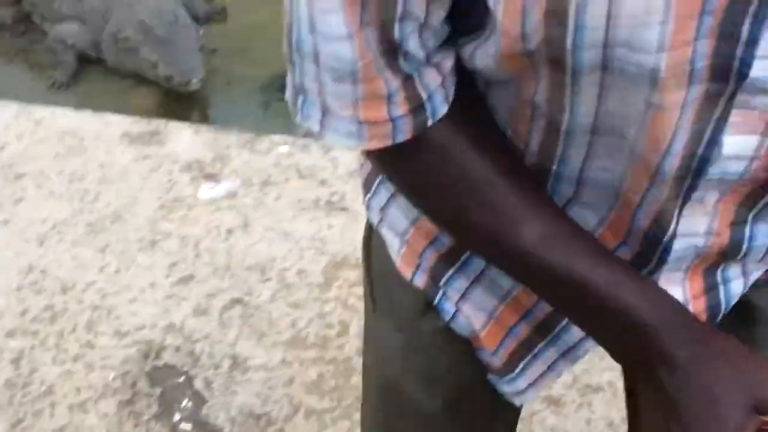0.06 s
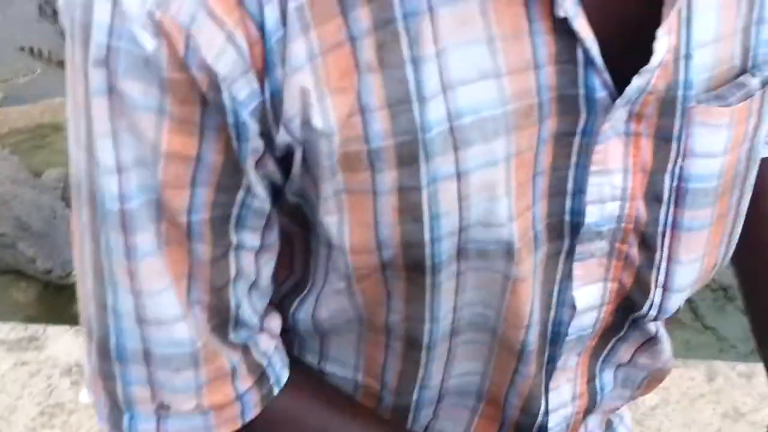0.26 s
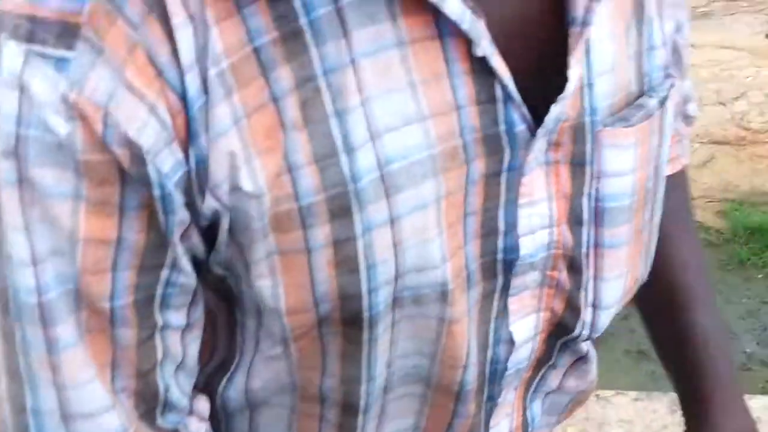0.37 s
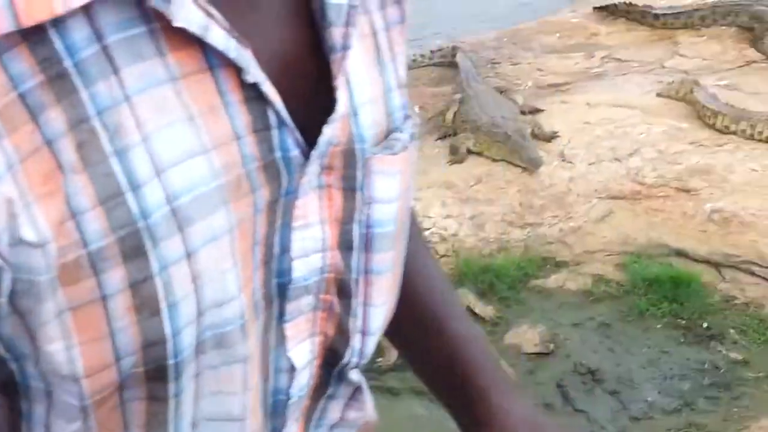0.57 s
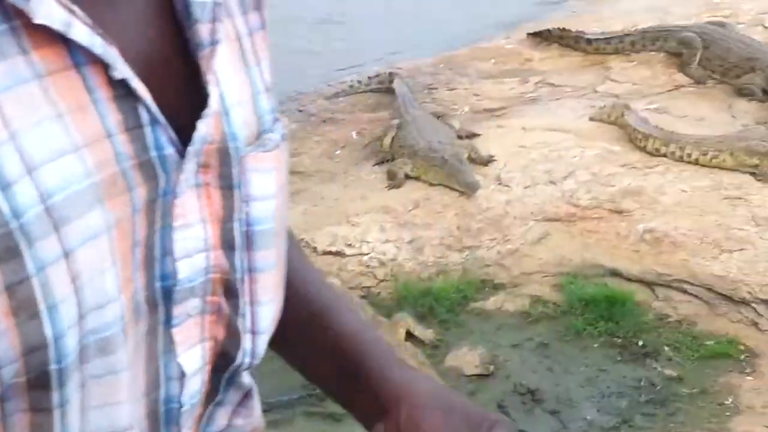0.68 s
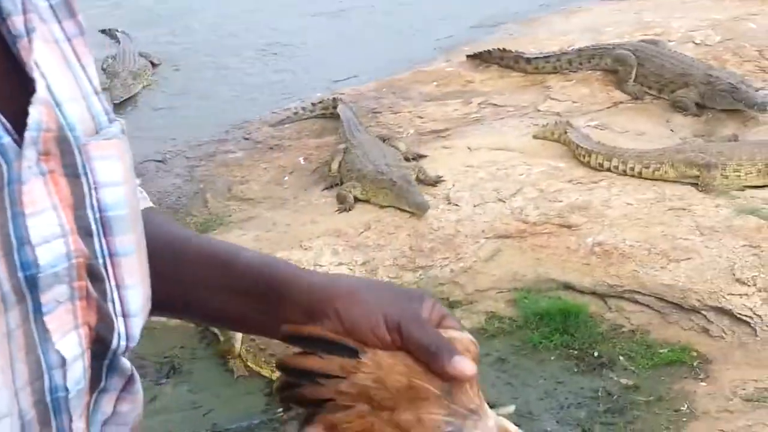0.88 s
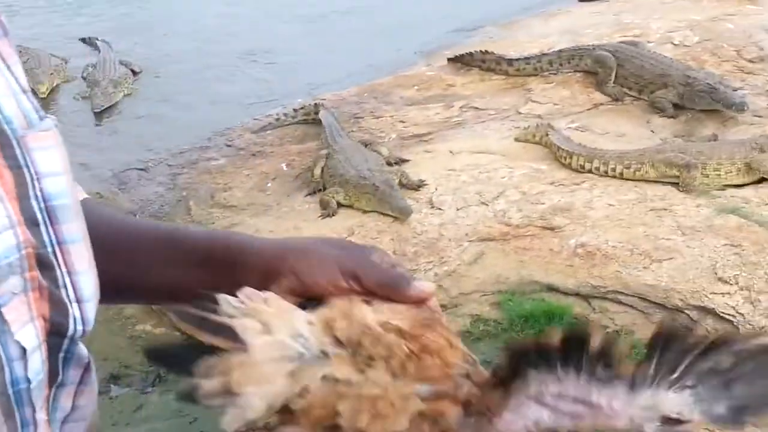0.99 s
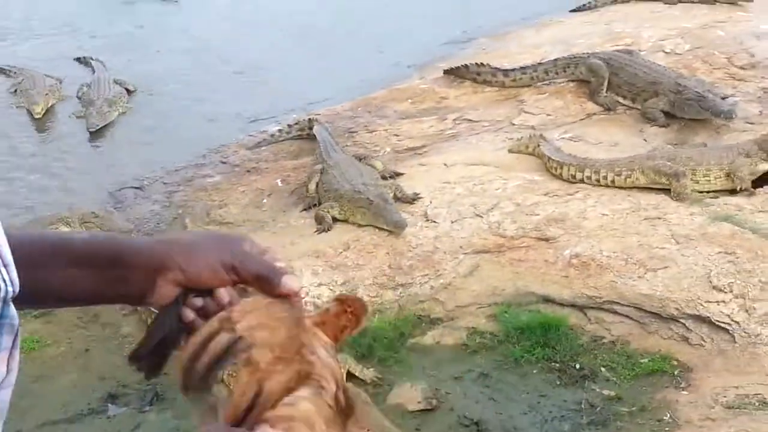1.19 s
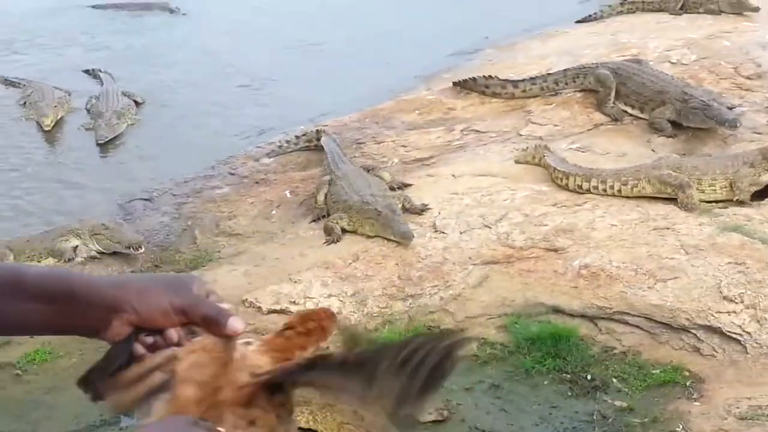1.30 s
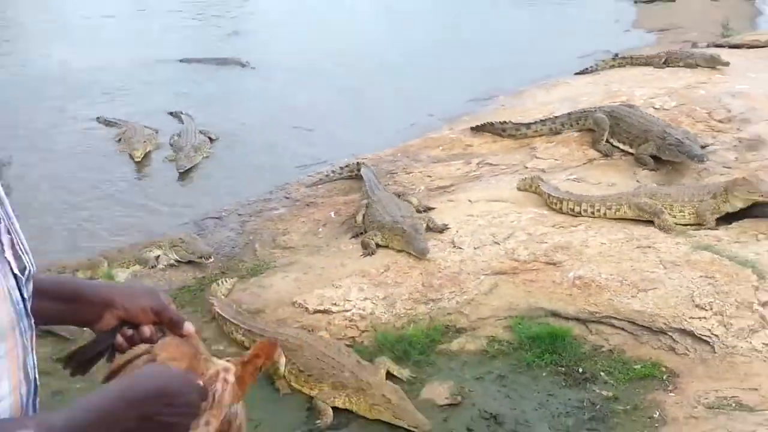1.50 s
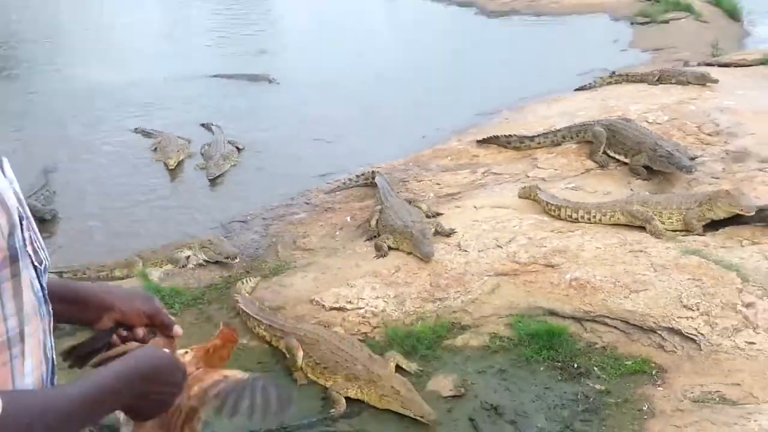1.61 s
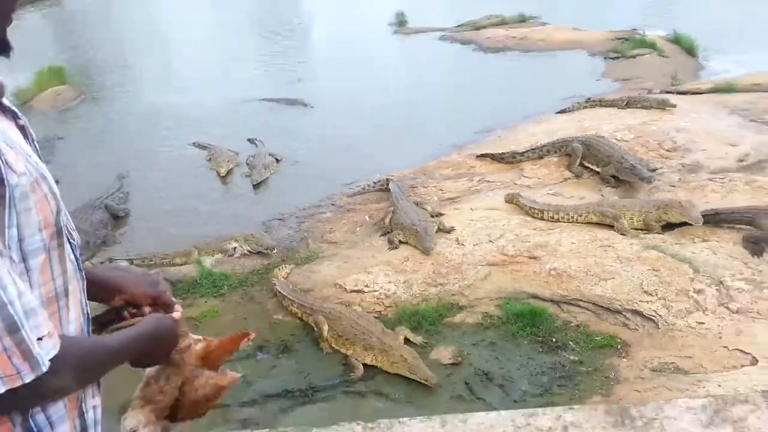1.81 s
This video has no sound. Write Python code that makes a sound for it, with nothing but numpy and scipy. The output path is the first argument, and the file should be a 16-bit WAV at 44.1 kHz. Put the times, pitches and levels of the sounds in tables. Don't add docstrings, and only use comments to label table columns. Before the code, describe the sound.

Harsh raspy chicken squawks very near the microphone, with a sharp knock and faint outdoor wash

```python
import sys
import numpy as np
from scipy import signal
from scipy.fft import rfft, irfft
from scipy.io import wavfile
from scipy.ndimage import uniform_filter1d, minimum_filter1d, map_coordinates

SR = 44100
rng = np.random.default_rng(int(sys.argv[2]) if len(sys.argv) > 2 else 0)


def magnitude_from_level(level_db):
    exponent = np.asarray(level_db, float) / 20
    return 10 ** exponent


def persist_wave(psi):
    counts = np.round(np.clip(psi, -1, 1) * 32767).astype(np.int16)
    wavfile.write(sys.argv[1], SR, np.atleast_2d(counts).T)


N = 81585


def evened(x):
    return x / np.sqrt(np.mean(x ** 2) + 1e-20)


def read(points, hz):
    f, value = np.transpose(points)
    return np.interp(np.log(hz + 1), np.log(f + 1), value)


def columns(rows):
    s, *cols = np.transpose(rows)
    start, end = round(s[0] * SR), round(s[-1] * SR)
    t = np.arange(start, end) / SR
    return start, [np.interp(t, s, c) for c in cols]


def add(mix, at, sound):
    part = mix[..., at:at + sound.shape[-1]]
    part += sound[..., :part.shape[-1]]


def drift(count, hz):
    pole = [1, -np.exp(-2 * np.pi * hz / SR)]
    once = signal.lfilter([1], pole, rng.standard_normal(N))
    return evened(signal.lfilter([1], pole, once)[-count:])


def edges(count, s=0.0016):
    k = np.arange(count)
    return np.clip(np.minimum(k, count - k) / (s * SR), 0, 1)


def resonate(x, hz, width):
    turn = np.exp(2j * np.pi * np.cumsum(hz * np.ones(len(x))) / SR)
    r = np.exp(-np.pi * width / SR)
    return 2 * (turn * signal.lfilter([(1 - r) ** 2], [1, -2 * r, r * r], x / turn)).real


def split(db):
    return magnitude_from_level(np.multiply.outer([.5, -.5], db))


def echoes(x, gap_s, t60):
    t = np.arange(SR // 2) / SR
    signs = rng.choice([-1., 1.], (2, len(t)))
    present = rng.random((2, len(t))) < .06
    taps = signs * present * magnitude_from_level(-60 * t / t60) * (t > gap_s)
    taps = taps / np.linalg.norm(taps, axis=1, keepdims=True)
    return signal.fftconvolve(x, taps, axes=1)[:, :N]


def noise(tone_curve, patchy_db, flicker_db):
    # frequency in Hz, likeness of left and right (-1 to 1)
    likeness = [(400, 0.74), (1500, -0.42), (2500, -0.3)]
    # frequency in Hz, left minus right in dB
    shade = [(100, -1), (3000, -3), (8000, -10.5)]
    frames, hz = N // 128 + 5, np.fft.rfftfreq(512, 1 / SR)
    a, b, c, d, grain = rng.standard_normal((frames, 257, 5)).T
    flicker = evened(uniform_filter1d(uniform_filter1d(grain, size=60, axis=0), size=2, axis=1))
    patches = evened(uniform_filter1d(uniform_filter1d(grain, size=6, axis=0), size=20, axis=1))
    same = np.clip(read(likeness, hz), -1, 1)[:, None]
    left = a + 1j * b
    right = same * left + np.sqrt(1 - same ** 2) * (c + 1j * d)
    z = np.array([left, right]) * split(read(shade, hz))[:, :, None]
    z = z * magnitude_from_level(read(tone_curve, hz)[:, None] + patchy_db * patches + flicker_db * flicker)
    return evened(signal.istft(z, nperseg=512, noverlap=384)[1][:, :N])


def open_air():
    # time in seconds, level in dB
    level = [(.1, -47.5), (.35, -43.5), (.44, -73.5), (.58, -86), (.62, -52), (.68, -66.5), (.75, -52),
             (.85, -52), (.95, -44), (1.08, -35.5), (1.11, -55), (1.17, -41), (1.35, -44), (1.47, -52),
             (1.55, -46), (1.85, -46)]
    # frequency in Hz, level in dB
    colour = [(25, -38), (100, 0), (280, 13.5), (700, 4.5), (2500, -18), (6000, -60), (15000, -50)]
    fader = magnitude_from_level(np.interp(np.arange(N) / SR, *np.transpose(level)))
    return fader * noise(colour, patchy_db=1.5, flicker_db=1.2)


def rustle():
    # time in seconds, level in dB
    level = [(0, -36.5), (.13, -37.5), (.17, -43.5), (.4, -32.5), (.86, -29), (.91, -36.5), (.96, -35),
             (1.2, -34), (1.4, -36), (1.48, -49), (1.52, -31.5), (1.66, -34.5), (1.7, -40.5), (1.85, -38)]
    # frequency in Hz, level in dB
    colour = [(100, -44), (250, -22), (600, -5), (1500, -1), (5000, -1.5), (8000, -11), (12000, -17),
              (15000, -47)]
    fader = magnitude_from_level(np.interp(np.arange(N) / SR, *np.transpose(level)))
    return fader * noise(colour, patchy_db=1.4, flicker_db=1.8)


def wing_draughts():
    # start in seconds, level in dB
    puffs = [
        (1.001, -31.5),
        (1.034, -34.5),
        (1.289, -40.5),
    ]
    out = np.zeros((2, N))
    for s, db in puffs:
        count = round(0.027 * SR)
        push = np.array([drift(count, 94), drift(count, 70)])
        add(out, round(s * SR), magnitude_from_level(db) * push * np.hanning(count))
    return out


def bumps():
    # start in seconds, level in dB, length in seconds, centre in Hz
    knocks = [
        (.007, -27, .006, 5200),
        (0.083, -29.5, .016, 4510),
        (0.982, -6.5, 0.004, 4200),
        (1.042, -25, 0.024, 8120),
        (1.157, -22.5, 0.015, 510),
        (1.159, -18, 0.0063, 5050),
    ]
    out = np.zeros((2, N))
    for s, db, length, hz in knocks:
        t = np.arange(0, 2 * length, 1 / SR)
        a, b = rng.standard_normal((2, 4000))[:, :len(t)] * magnitude_from_level(2.0 * drift(len(t), 660))
        grit = [evened(resonate(v, hz, 3200)) for v in (a, .8 * a + .6 * b)]
        swell = magnitude_from_level(db - 12.8 * (t / length / 2) ** 2) * np.minimum(t / 0.011, 1)
        add(out, round(s * SR), split(-5.0)[:, None] * grit * swell)
    return out


def squeaks():
    # time in seconds, pitch of the third harmonic in Hz, level in dB
    glides = [
        [(0.034, 4100, -44), (0.042, 4655, -19), (0.05, 4900, -50)],
        [(0.055, 4600, -16), (0.061, 4850, -24), (0.068, 4500, -41)],
    ]
    harmonics_db = [-25, -13, -9, -19]
    out = np.zeros(N)
    for rows in glides:
        at, (hz, db) = columns(rows)
        turns = np.cumsum(hz / 3 * (1 + 0.002 * drift(len(hz), 300))) / SR
        voice = sum(magnitude_from_level(db + g) * np.sin(2 * np.pi * (m + 1) * turns) for m, g in enumerate(harmonics_db))
        add(out, at, voice * edges(len(hz), 0.0022))
    out = np.array([out * magnitude_from_level(12.5), np.roll(out, 20) * magnitude_from_level(12.0)])
    return out + magnitude_from_level(-21.0) * echoes(out, .002, .12)


def rasp(rows, tilt_db):
    # multiple of the windpipe pitch, width in Hz, level in dB
    windpipe = [(1.0, 690, -6.5), (2.12, 770, 1), (3.1, 650, 1), (3.75, 790, 0), (4.9, 870, -4),
                (5.9, 610, -12.5), (7.1, 1300, -16.5), (8.8, 2150, -21.5)]
    jitter, shimmer_db, breath = .09, 1.8, .38
    flutter_db, chest_hz = 0.98, 700
    at, (db, hz) = columns(rows)
    turns = np.cumsum(hz * np.clip(1 + jitter * drift(len(hz), 500), .3, 2)) / SR
    size = magnitude_from_level(shimmer_db * rng.standard_normal(N // 8))[turns.astype(int)]
    slaps = evened(np.diff(np.floor(turns), prepend=0) * size)
    hiss = evened(size * np.exp(-(turns % 1) / 0.5) * rng.standard_normal(N)[:len(hz)])
    drive = (1 - breath) * slaps + breath * hiss
    pipe = np.zeros(len(hz))
    for k, (multiple, width, gain_db) in enumerate(windpipe):
        pipe += (-1) ** k * magnitude_from_level(gain_db + tilt_db * k) * resonate(drive, multiple * hz, width)
    pipe = signal.sosfilt(signal.butter(4, chest_hz, "high", fs=SR, output="sos"), pipe)
    pipe = pipe / np.sqrt(uniform_filter1d(pipe ** 2, size=700) + 1e-12)
    return at, pipe * magnitude_from_level(db + flutter_db * drift(len(hz), 38)) * edges(len(hz))


def rasping_calls():
    # time in seconds, effort in dB, windpipe pitch in Hz
    rasp_a = [(0.194, -14, 887), (0.201, -14.5, 899.5), (0.389, -13.5, 984.3), (0.458, -15, 962.6),
              (.58, -15, 918), (0.618, -25, 896), (.645, -51, 970)]
    rasp_b = [(.645, -64, 870.3), (0.704, -42, 910.3), (0.714, -20, 906.7), (0.755, -13, 926.3),
              (0.769, -59, 903.6), (0.847, -60.5, 905.7), (0.855, -16, 879), (0.906, -16.5, 887),
              (0.919, -80, 890)]
    rasp_c = [(.989, -32, 700), (.993, -14, 700), (1.008, -13, 760), (1.022, -10, 990), (1.05, -8, 980),
              (1.062, -27, 930), (1.105, -27, 950), (1.115, -18, 950), (1.135, -22, 720), (1.142, -40, 700)]
    rasp_d = [(1.216, -32, 900), (1.233, -14, 960), (1.245, -17, 960), (1.286, -16, 960), (1.304, -11, 970),
              (1.323, -15, 1030), (1.385, -12, 1030), (1.408, -14, 1011), (1.428, -26, 971),
              (1.44, -30, 983)]
    rasp_e = [(1.44, -29, 875), (1.472, -38, 801.4), (1.484, -18.5, 789.6), (1.495, -28, 806.3),
              (1.506, -18.5, 716)]
    rasp_f = [(1.747, -35.5, 720), (1.754, -35, 693.4), (1.771, -35.5, 863), (1.8, -31.5, 1024),
              (1.85, -28, 975)]
    bright_db = [-0.24, -0.91, 0.52, -0.75, 1, -2.5]
    out = np.zeros(N)
    for rows, tilt_db in zip((rasp_a, rasp_b, rasp_c, rasp_d, rasp_e, rasp_f), bright_db):
        add(out, *rasp(rows, tilt_db))
    return out


def tone(rows, overtones, throw):
    wobble_db, fall_db = 4, -2.5
    at, (hz, low_db, top_db) = columns(rows)
    turns = np.cumsum(hz * (1 + 0.0059 * drift(len(hz), 170))) / SR
    out = np.zeros((2, len(hz)))
    overtones = overtones + list(overtones[-1] + fall_db * np.arange(1, 6))
    for k, db in enumerate([low_db] + [top_db + o for o in overtones]):
        wobble = wobble_db * min(k, 4) / 4 * np.array([drift(len(hz), 33), drift(len(hz), 43)])
        pan = split(throw[min(k, len(throw) - 1)])[:, None]
        out += pan * magnitude_from_level(db + wobble) * np.cos(2 * np.pi * (k + 1) * turns - 0.8 * k * k)
    return at, np.sqrt(2) * out * edges(len(hz))


def locked_calls():
    # time in seconds, pitch in Hz, fundamental in dB, overtones in dB
    tone_a = [(.57, 781.7, -35.5, -40), (0.598, 770.6, -27, -20), (0.62, 756, -28, -29),
              (0.632, 736, -28.5, -19), (0.66, 725, -30.5, -20.5), (0.678, 745, -25.5, -16.5),
              (0.704, 703.5, -36, -21.5), (0.715, 737, -19, -19)]
    tone_b = [(.712, 755, -23.5, -21), (0.751, 767, -24.5, -24), (0.76, 765, -22, -18),
              (0.793, 766.6, -16.5, -11), (0.814, 752, -22.5, -14.5), (0.849, 746.7, -20.5, -16.5),
              (0.874, 755, -24, -23.5)]
    tone_c = [(.997, 773.6, -19, -50), (1.038, 779.4, -16, -12), (1.052, 783.3, -15, -12.5),
              (1.073, 791, -18, -10), (1.087, 799, -21, -18), (1.099, 765, -20.5, -8),
              (1.119, 762, -31, -26)]
    tone_d = [(1.385, 799, -27, -15), (1.42, 795.2, -29.5, -16.5), (1.441, 800, -24, -11),
              (1.448, 840, -32, -13)]
    tone_e = [(1.446, 824, -31, -15), (1.455, 845, -24, -15), (1.472, 867, -30.5, -13.5),
              (1.482, 825, -25, -19)]
    tone_f = [(1.479, 816, -38, -20), (1.487, 777, -23.5, -12), (1.499, 786, -35, -20),
              (1.503, 790, -59, -23)]
    overtones = [
        [-5, 5.5, -0.5, 1.5, -16.5, -8, -15, -19],
        [-3, 1.5, -8.5, -3, -20, -13.5, -26.5, -20.5],
        [-9.5, 1, -4, -7.5, -14, -12, -20, -16],
        [-16, 2, 1, -10, -13, -22, -24.5, -24.5],
        [-7, -4.5, -10.5, -6, -14.5, -19, -22, -34],
        [-0.5, -3.5, -2.5, -17, -16, -20, -35, -18.5],
    ]
    # left minus right in dB, from the fundamental up
    throw = [[4, -14, 4, 1, -1, -5], [0, -6, 4, 8, -5, -5], [-1, -8, 4, 2, 1, -6]] + 3 * [[1, 5, 0, -4, 7,
             -2]]
    out = np.zeros((2, N))
    for call in zip((tone_a, tone_b, tone_c, tone_d, tone_e, tone_f), overtones, throw):
        add(out, *tone(*call))
    return out


def catches():
    # middle in seconds, length in seconds, pitch in Hz, level in dB, left minus right in dB
    rings = [(.235, .02, 900, -27, 0), (.287, .025, 2080, -21, 3), (.325, .03, 2880, -21, 5),
             (.392, .03, 2015, -18, 3), (.39, .03, 3040, -19, 5), (.41, .06, 960, -27, 0),
             (.43, .02, 3000, -20, 5), (.996, .016, 1400, -11, 0), (1.008, .016, 1550, -15, 0),
             (1.03, .024, 2150, -13, 0), (1.046, .014, 2050, -9, 0), (1.052, .016, 3720, -14, 0),
             (1.26, .04, 1990, -16, 0), (1.303, .03, 2935, -9, 0), (1.29, .04, 970, -25, 0),
             (1.33, .04, 1000, -26, 0), (1.365, .05, 975, -22, 0), (1.345, .05, 2300, -18, 0),
             (1.41, .04, 2000, -21, 0), (1.405, .04, 2800, -22, 0), (1.415, .035, 3600, -20, 0),
             (1.41, .04, 1200, -32, 0), (1.754, .016, 1410, -36, 0), (1.77, .02, 1700, -39, 0),
             (1.825, .05, 2010, -33, -2)]
    out = np.zeros((2, N))
    for s, length, hz, db, pan_db in rings:
        count = round(length * SR)
        turns = np.cumsum(hz * (1 + .012 * drift(count, 120))) / SR
        level = magnitude_from_level(db + 3 + 2 * drift(count, 150)) * np.hanning(count) ** .7
        add(out, round((s - length / 2) * SR), split(pan_db)[:, None] * level * np.sin(2 * np.pi * turns))
    return out


def hen():
    # time in seconds, left lead in samples
    path = [(.25, 15.5), (.62, 11.5), (.8, 7.5), (1.05, 3), (1.25, 1), (1.8, 1)]
    # frequency in
    # Hz, left minus right in dB
    shade_side = [(600, 10.5), (1500, -15.5), (2300, 4.5), (3500, 5.5), (4700, -7.5), (9000, -11.5)]
    shade_front = [(600, -6), (2500, -1.5), (7000, -5.5)]
    near_db, near_t60_s = -5, .009 * 4
    far_db, far_t60_s = -19, 0.2
    rough, clean = rasping_calls(), catches() + locked_calls()
    k, hz = np.arange(N), np.fft.rfftfreq(N, 1 / SR)
    lead = np.interp(k / SR, *np.transpose(path))
    side, front = (irfft(rfft(rough) * split(read(s, hz)), N) for s in (shade_side, shade_front))
    share = np.clip(lead / 6, 0, 1)
    rough = share * side + (1 - share) * front
    voice = clean + rough + magnitude_from_level(near_db) * echoes(rough, .0004, near_t60_s)
    late_right = map_coordinates(voice[1], [k - lead], order=3, mode="nearest")
    voice = np.array([voice[0], late_right])
    voice = voice + magnitude_from_level(far_db) * echoes(voice, 0.004, far_t60_s)
    return signal.sosfilt(signal.butter(4, 520, "high", fs=SR, output="sos"), voice)


def scene():
    return open_air() + rustle() + wing_draughts() + bumps() + squeaks() + hen()


def roll_off(x):
    return signal.sosfilt(signal.butter(12, 15500, fs=SR, output="sos"), x)


def record(dry):
    cut = signal.sosfilt(signal.butter(2, 60, "high", fs=SR, output="sos"), dry)
    gain = np.minimum(1.03 / (abs(cut) + 1e-9), 1)
    gain = uniform_filter1d(minimum_filter1d(gain, size=151), size=151)
    return roll_off(np.clip(cut * gain, -1.0, 1.0))


dry = scene()
out = record(dry)
persist_wave(out)
```